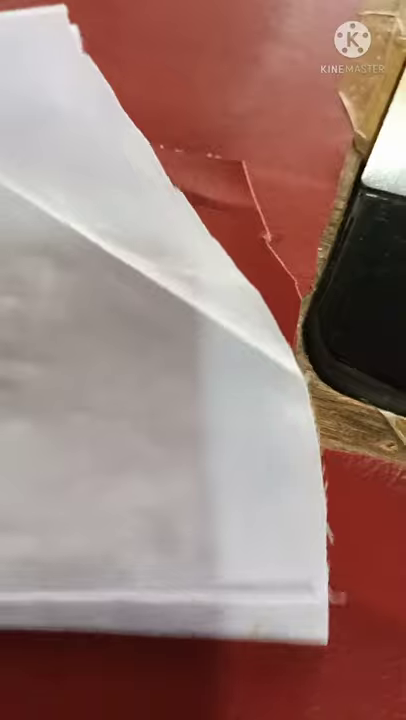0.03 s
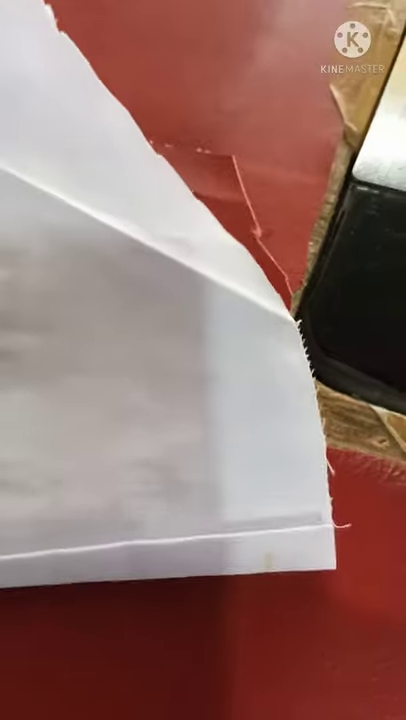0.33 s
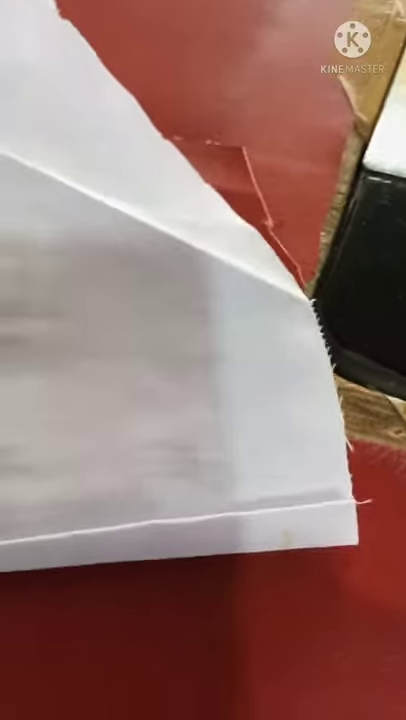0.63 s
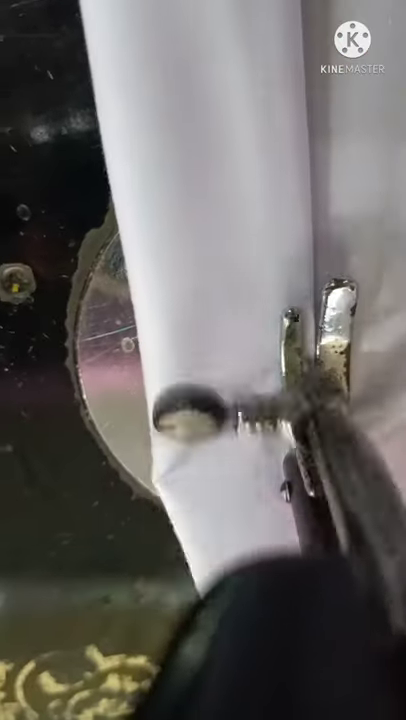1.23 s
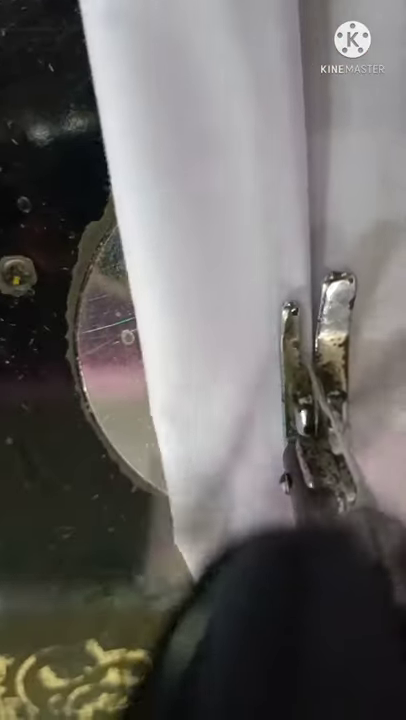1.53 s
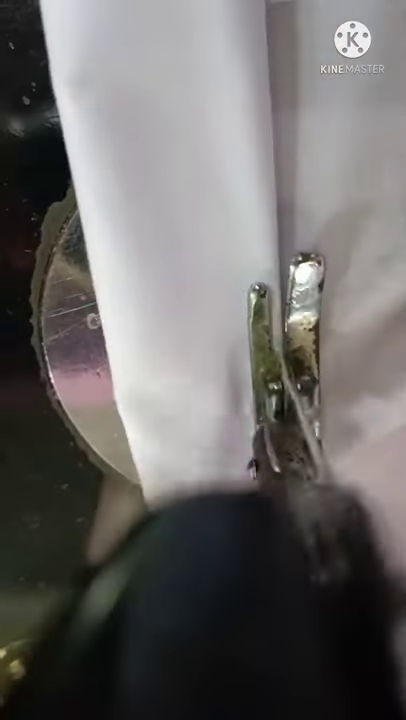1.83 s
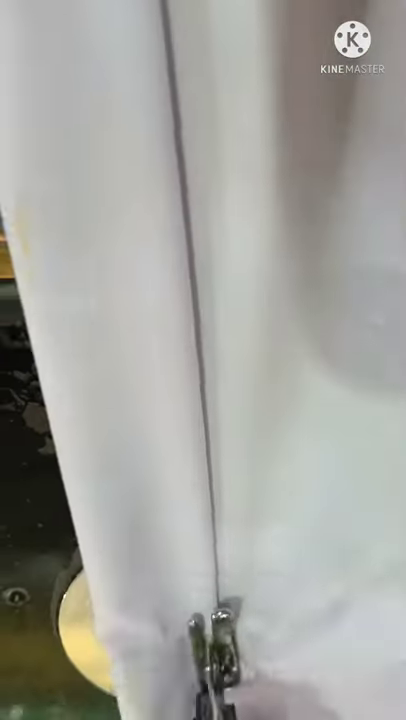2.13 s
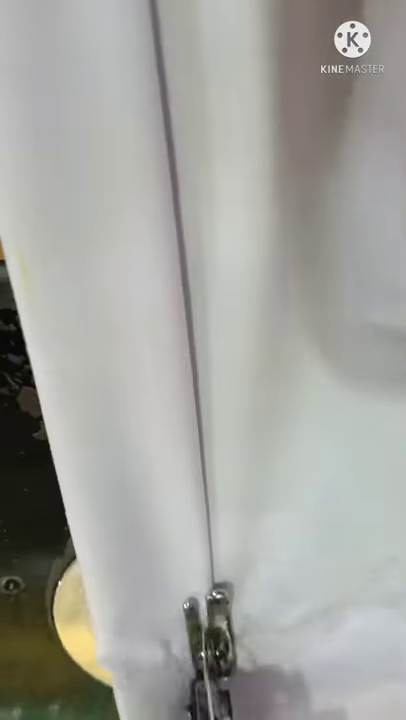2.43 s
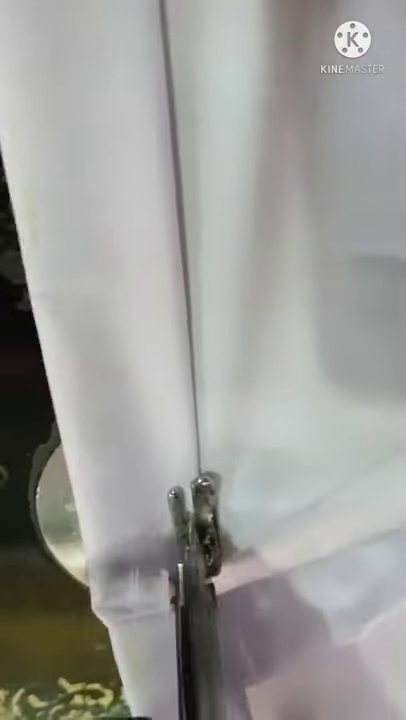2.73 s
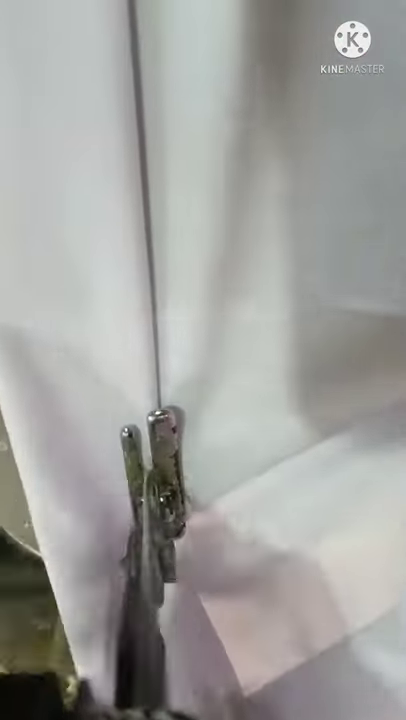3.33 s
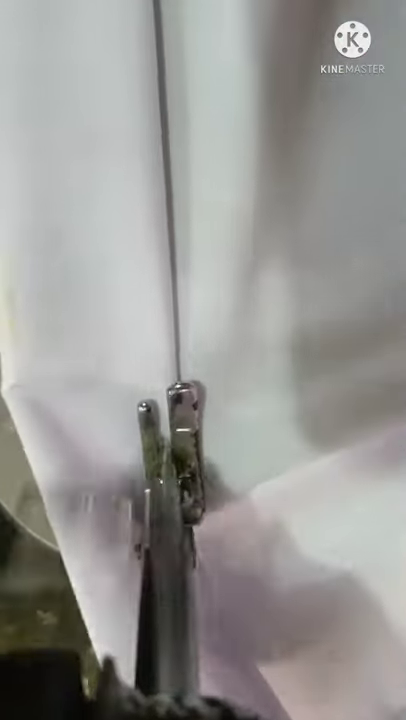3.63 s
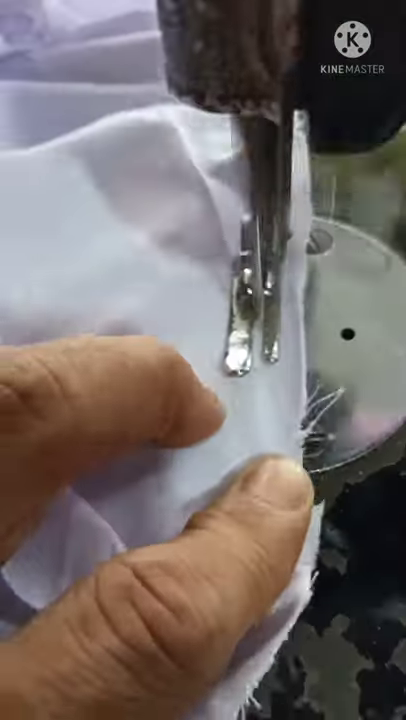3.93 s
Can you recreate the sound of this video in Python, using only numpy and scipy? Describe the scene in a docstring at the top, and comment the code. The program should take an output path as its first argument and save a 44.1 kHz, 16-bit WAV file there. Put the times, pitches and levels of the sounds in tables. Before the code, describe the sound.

Close up in a quiet room, a sewing machine rattles through a seam, its needle ticking and its steel parts clicking over dull wooden knocks. The stitching eases off, then picks up again at a quicker pace.

```python
"""Old iron sewing machine, close up

On a wooden table in a small room, the stereo microphone close by. A short stretch of room rush comes
first; then the machine sews a seam at about 13 stitches a second, slows, and sews a faster one.
Every turn of the shaft repeats the same contacts: they thump the table, rattle the linkage, click on
steel and tick at the needle. Sliding parts rasp, and a few puffs of air push on the microphone."""
import sys
import numpy as np
from scipy import signal
from scipy.fft import rfft, irfft
from scipy.io import wavfile

SR = 44100
rng = np.random.default_rng(int(sys.argv[2]) if len(sys.argv) > 2 else 0)


def unload_wav(signal):
    """Save mono or channel-first audio to the path in sys.argv[1] as 16-bit WAV at rate SR, clipped to [-1, 1]."""
    wavfile.write(
        sys.argv[1],
        SR,
        np.round(np.clip(np.atleast_2d(signal).T, -1, 1) * 32767).astype(np.int16),
    )


N = 176400
T = np.arange(N) / SR

# room rush over time: time_s, level_db
RUSH_LEVEL = [(.16, -90), (.18, -52), (.203, -44.5), (.21, -37.5), (.69, -38.5), (.755, -49.5), (.77, -110),
              (.875, -78), (.895, -51), (.95, -35.5), (3.95, -45), (3.98, -57)]
# its spectrum: frequency_hz, density_db
RUSH_COLOUR = [(60, -7.5), (135, -8), (200, -0.5), (500, -3), (720, -9), (2000, -12), (4000, -23.5),
               (6000, -26), (7000, -20), (8500, -29.5), (10000, -18.5), (11400, -32), (15500, -32)]
# how alike it is left and right: frequency_hz, likeness (0-1)
RUSH_LIKENESS = [(60, 0.78), (240, 0.99), (950, 0)]
# boundaries of the shaft's turns, one stitch a turn: time_s
SLOW_STITCHES = [0.945, 1.000, 1.069, 1.151, 1.238, 1.337, 1.420, 1.486, 1.559, 1.645, 1.71, 1.779, 1.86,
                 1.934, 1.998, 2.07, 2.153, 2.252, 2.351]
FAST_STITCHES = [2.358, 2.415, 2.47, 2.533, 2.598, 2.65, 2.71, 2.778, 2.835, 2.892, 2.950, 3.015, 3.073,
                 3.126, 3.178, 3.244, 3.309, 3.360, 3.406, 3.453, 3.501, 3.550, 3.598, 3.640, 3.684, 3.735,
                 3.788, 3.845, 3.894, 3.957]
# contacts within a turn: turn_share, thump_db, knock_db, rattle_db, click_db, tick_db
SLOW_CONTACTS = [(.01, -3.5, -20, 4, 4.5, -17), (.09, -7, 3, 5.5, -12, -14), (.14, -22, 2.5, 3, -7, 13.5),
                 (.18, -8, -3.5, 1, 4.5, 4), (.31, -5, 2, 7, -1, -1), (.42, 4.5, -2.5, -3, -2, 4),
                 (.61, -3.5, -9, 2, 2.5, 6.5), (0.791, -5, -1, 3.5, -19, -22),
                 (0.922, -15, -9, 3.5, -8, -29)]
FAST_CONTACTS = [(.03, -5.5, -5, 10.5, 12, 10), (.1, -19, -4.5, 7, 2, 7), (.19, -12, -4, 1.5, 2, 4),
                 (.31, -4, -2, 10, 1, 4), (0.441, 0.5, -1, 2, 3, 6), (.82, -6.5, -2, 2.5, 4.5, 2),
                 (0.909, -4.5, -8.5, 8.5, -4, -4)]
# modes of the table and the machine's bed: pitch_hz, drive_db, t60_s
SLOW_TABLE_MODES = [(233.7, 3.5, 0.15), (300, -2.5, 0.12), (332.4, -9, 0.18), (514.2, 3.5, 0.16)]
FAST_TABLE_MODES = [(271.5, -1, 0.13), (327.5, -4, 0.18), (379, -6.5, 0.1), (596, 2, 0.1)]
# modes of the steel linkage: pitch_hz, drive_db, t60_s
SLOW_STEEL_MODES = [(990, 4.5, 0.089), (1680, 14.5, 0.025), (2099, 5, 0.062), (5770, 10, 0.0097),
                    (10600, -3.5, .08)]
FAST_STEEL_MODES = [(1121, -1.5, 0.095), (1922, 7.5, 0.037), (2590, -6, 0.09)]
# loose parts, a row each for knock, rattle, click and tick:
# low_hz, high_hz, t60_s, swell_db, impact_db, likeness (left to right, 0-1)
LOOSE_PARTS = [(276.4, 917, 0.029, -1.5, -20.5, 0.95), (918, 3760, 0.034, -2.5, -17.5, 0.13),
               (3440, 13000, 0.069, -5, -40, 0), (12700, 21000, 0.0069, -20, -24, 0.2)]
# tone of the loose parts at the microphone: frequency_hz, gain_db, left_minus_right_db
SLOW_COLOUR = [(327, 5, -3), (420, 0.5, -7), (670, 0, -1), (1320, -4.5, -7), (2300, -7, -1.5),
               (2470, -9, -6.5), (4360, -16, 2), (5660, -16, 2.5), (9100, -20, -1), (10700, -19.5, -45),
               (12300, -22, 9), (14230, -7, 48), (16100, -11, 35)]
FAST_COLOUR = [(358, -1, -3.5), (500, -6.5, 4), (553, -1.5, 2.5), (950, -5.5, 5), (1630, -7, -7),
               (1820, -6, -3), (2700, -6, -4.5), (3470, -13.5, -6.5), (4900, -19, 3.5), (11800, -24, -7),
               (13600, -27.5, -7), (14600, -24, 16)]
# rise and fall of the running machine: time_s, gain_db
MACHINE_LEVEL = [(.87, -75), (.94, -17), (.96, 3), (1.08, 1), (1.33, 0.5), (1.44, 3.5), (1.95, 1.5),
                 (2.15, 0.5), (2.25, -4.5), (2.34, -4.5), (2.36, 1.5), (3.955, 0), (3.972, -24), (4, -30)]
# harder steel clacks: start_s, level_db
CLACKS = [(1.072, -23.5), (1.421, -21), (1.781, -30.5), (2.47, -24.5)]
# scrape, strongest as the first seam winds down: time_s, gain_db
SCRAPE_LEVEL = [(1.6, -36), (2.0, -32.5), (2.25, -25.5), (2.35, -41)]
# puffs of air on the microphone: start_s, level_db
PUFFS = [(1.947, -19), (3.369, -27), (3.414, -21), (3.559, -18), (3.648, -24.5)]


def from_db(db):
    """Decibels to gain."""
    return 10 ** (np.asarray(db) / 20)


def unit_power(x):
    """Scale to an RMS of one."""
    return x / np.sqrt(np.mean(x ** 2) + 1e-20)


def level(rows):
    """Gain over time from rows of time_s, level_db."""
    return from_db(np.interp(T, *np.transpose(rows)))


def at_hz(rows, hz, column=1):
    """Read one column of a spectrum along a log-frequency axis."""
    rows = np.array(rows)
    return np.interp(np.log(np.maximum(hz, 1)), np.log(rows[:, 0]), rows[:, column])


def pan(db):
    """Constant-power stereo gains, the left louder by db."""
    gains = from_db(np.array([[.5], [-.5]]) * db)
    return gains / np.sqrt(np.mean(gains ** 2, axis=0))


def widen(pair, likeness):
    """Two unrelated signals become left and right with the given likeness."""
    return np.sqrt(1 + likeness) * pair[0] + np.sqrt(1 - likeness) * pair[1] * np.array([[1], [-1]])


def bandpass(x, band_hz, order):
    """Butterworth band-pass."""
    return signal.sosfilt(signal.butter(order, band_hz, "band", fs=SR, output="sos"), x)


def equalise(x, gain):
    """Minimum-phase filter with the given gain at each bin of a 2N-point FFT."""
    cepstrum = irfft(np.log(gain + 1e-9))
    cepstrum[..., 1:N] *= 2
    cepstrum[..., N + 1:] = 0
    return irfft(rfft(x, 2 * N) * np.exp(rfft(cepstrum)))[..., :N]


def room_rush():
    """The room's rush, central in the bass and wide above; it drops out just before the sewing."""
    hz = np.fft.rfftfreq(N, 1 / SR)
    white = widen(rfft(rng.standard_normal((2, N))), at_hz(RUSH_LIKENESS, hz))
    return level(RUSH_LEVEL) * unit_power(irfft(white * from_db(at_hz(RUSH_COLOUR, hz)), N))


def contact_times(stitches, turn_shares, jitter_s=0.00055):
    """Each contact comes at its own share of every turn."""
    starts = np.array(stitches)
    times = starts[:-1, None] + np.diff(starts)[:, None] * turn_shares
    return times + jitter_s * rng.standard_normal(times.shape)


def impacts(times, contact_db, spread_db=3):
    """One impulse per contact, never twice equally strong."""
    db = contact_db + spread_db * rng.standard_normal(times.shape)
    blows = np.zeros(N)
    np.add.at(blows, np.clip(times * SR, 0, N - 1).astype(int), from_db(db))
    return blows


def ring(drive, hz, t60_s):
    """One damped mode, set ringing by the drive."""
    r = np.exp(-np.log(1000) / (t60_s * SR))
    w = 2 * np.pi * hz / SR
    return signal.lfilter([np.sin(w), 0, -np.sin(w)], [1, -2 * r * np.cos(w), r * r], drive + 1e-18) / w**2


def table_thumps(times, contact_db, modes):
    """Heavy, blunt contacts ring the table and the bed, which radiate little bass."""
    rings = sum(from_db(db) * ring(impacts(times, contact_db), hz, t60) for hz, db, t60 in modes)
    return unit_power(bandpass(rings, band_hz=(222.6, 910), order=4))


def steel_rings(times, contact_db, modes, pitch_spread=0.011):
    """Contacts ring the levers briefly; as these move, each blow finds a slightly different pitch."""
    out = np.zeros(N)
    for hz, db, t60 in modes:
        blows = from_db(db) * impacts(times, contact_db, spread_db=4.5)
        detunes = pitch_spread * rng.standard_normal(times.size)
        for start, detune in zip(np.flatnonzero(blows), detunes):
            t = T[:min(int(t60 * SR), N - start)]
            decay = blows[start] * np.exp(-np.log(1000) * t / t60)
            out[start:start + len(t)] += decay * np.sin(2 * np.pi * hz * (1 + detune) * t)
    return unit_power(out)


def die_away(energy, t60_s):
    """Spread each blow's energy over an exponential decay."""
    r = np.exp(-np.log(1e6) / (t60_s * SR))
    return signal.lfilter([1 - r], [1, -r], energy + 1e-18)


def rattling_parts(times, part_dbs, colour, grain_db=1.5, room_db=-11):
    """A soft hiss swells into each strike; loose parts chatter and leave a short tail in the room."""
    out = 0
    for contact_db, (low, high, t60, swell_db, impact_db, likeness) in zip(part_dbs, LOOSE_PARTS):
        blows = impacts(times, contact_db)
        energy = blows ** 2
        # a decay run backwards rises into each blow
        swell = from_db(swell_db) ** 2 * die_away(energy[::-1], t60_s=0.13)[::-1]
        hiss = rng.standard_normal((2, N))
        flicker = from_db(grain_db * np.repeat(rng.standard_normal(N), 20)[:N])
        chatter = unit_power(hiss * flicker) * np.sqrt(swell + die_away(energy, t60))
        tail = from_db(room_db) * rng.standard_normal((2, N)) * np.sqrt(die_away(energy, t60_s=.25))
        strikes = from_db(impact_db) * blows * rng.choice([-1, 1], (2, N))
        part = unit_power(widen(strikes + chatter + tail, likeness))
        out = out + bandpass(part, (low, min(high, .45 * SR)), order=4)
    hz = np.fft.rfftfreq(2 * N, 1 / SR)
    tone = from_db(at_hz(colour, hz)) * pan(at_hz(colour, hz, column=2))
    return unit_power(equalise(out, tone))


def sliding_band(hz, width_hz):
    """Friction noise in a resonance whose centre moves."""
    lowpass = signal.butter(2, width_hz / 2, fs=SR, output="sos")
    friction = signal.sosfilt(lowpass, rng.standard_normal((2, N)))
    phase = 2 * np.pi * np.cumsum(hz) / SR
    return unit_power(friction[0] * np.cos(phase) + friction[1] * np.sin(phase))


def falling_rasp(stitches, from_hz=2755, to_hz=478.5, gain_db=-28.5):
    """Once a turn a sliding part rasps through a resonance that drops quickly in pitch."""
    turn_share = np.interp(T, stitches, np.arange(len(stitches))) % 1
    slide = np.interp(turn_share, (0.33, 0.55), (0, 1))
    hz = from_hz * (to_hz / from_hz) ** slide
    swell = np.sqrt(np.abs(np.sin(np.pi * slide)))
    return from_db(gain_db) * swell * sliding_band(hz, width_hz=470)


def seam(stitches, contacts, table_modes, steel_modes, colour, thump_db, steel_db, rattle_db, table_pan_db):
    """One run of the machine: the shaft works table, levers, loose parts and rasp in step."""
    turn_shares, thump_dbs, *part_dbs = np.transpose(contacts)
    times = contact_times(stitches, turn_shares)
    thumps = from_db(thump_db) * pan(table_pan_db) * table_thumps(times, thump_dbs, table_modes)
    # the levers follow the contacts' rattle column
    levers = from_db(steel_db) * pan(db=-12) * steel_rings(times, part_dbs[1], steel_modes)
    rattle = from_db(rattle_db) * rattling_parts(times, part_dbs, colour)
    running_share = np.ptp(times) * SR / N  # keeps loudness independent of the seam's length
    return (thumps + levers + rattle) * np.sqrt(running_share) + falling_rasp(stitches)


def hard_clacks(t60_s=0.087):
    """Some stitches land with a harder steel clack, a bright burst that dies quickly."""
    decays = sum(from_db(db - 60 * np.abs(T - start) / t60_s) * (T >= start) for start, db in CLACKS)
    return decays * unit_power(bandpass(rng.standard_normal((2, N)), band_hz=(2800, 7400), order=2))


def scrape(peak_turn_share=0.14):
    """Friction sets one steel resonance sounding, swelling once in every turn of the slow seam."""
    turn = np.interp(T, SLOW_STITCHES, np.arange(len(SLOW_STITCHES)))
    swell = np.abs(np.cos(np.pi * (turn - peak_turn_share)))
    steel = unit_power(ring(rng.standard_normal((2, N)), hz=2350, t60_s=0.01))
    return level(SCRAPE_LEVEL) * swell * steel


def air_puffs():
    """Each puff is one low push on the microphone, almost all on the left."""
    impulses = np.zeros(N)
    for start, db in PUFFS:
        impulses[int(start * SR)] = from_db(db)
    pushes = bandpass(impulses + 1e-18, band_hz=(17.6, 106), order=2)
    return pan(db=34) * pushes * impulses.max() / pushes.max()


def whirr(from_hz=3724, to_hz=2630, gain_db=-36.5):
    """A metallic whirr swells with each fast stitch and sinks in pitch along the seam."""
    turn = np.interp(T, FAST_STITCHES, np.arange(len(FAST_STITCHES)), left=.5, right=.5)
    swell = np.cos(np.pi * turn) ** 2
    hz = np.interp(T, [FAST_STITCHES[0], FAST_STITCHES[-1]], (from_hz, to_hz))
    return from_db(gain_db) * swell * np.array([sliding_band(hz, width_hz=270) for _ in range(2)])


def reach_microphone(x, left_lag_s=0.00013):
    """The machine's sound reaches the left port a little later than the right."""
    delay = np.exp(-2j * np.pi * np.fft.rfftfreq(2 * N, 1 / SR) * left_lag_s)
    return np.array([irfft(rfft(x[0], 2 * N) * delay)[:N], x[1]])


def scene():
    """Two seams close to the microphone, over the rush of the room."""
    slow = seam(SLOW_STITCHES, SLOW_CONTACTS, SLOW_TABLE_MODES, SLOW_STEEL_MODES, SLOW_COLOUR,
                thump_db=-26.5, steel_db=-34, rattle_db=-24, table_pan_db=2)
    fast = seam(FAST_STITCHES, FAST_CONTACTS, FAST_TABLE_MODES, FAST_STEEL_MODES, FAST_COLOUR,
                thump_db=-26, steel_db=-29, rattle_db=-23, table_pan_db=5.5)
    machine = level(MACHINE_LEVEL) * (slow + fast + scrape() + whirr()) + hard_clacks()
    return reach_microphone(machine) + room_rush() + air_puffs()


def record(dry):
    """Peaks are rounded and the top is cut steeply."""
    peak_limit, cutoff_hz = .42, 15600
    rounded = peak_limit * np.tanh(dry / peak_limit)
    return signal.sosfilt(signal.ellip(12, .2, 90, cutoff_hz, fs=SR, output="sos"), rounded)


dry = scene()
out = record(dry)
unload_wav(out)
```